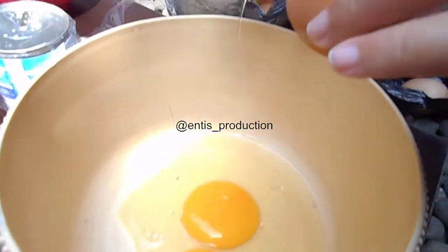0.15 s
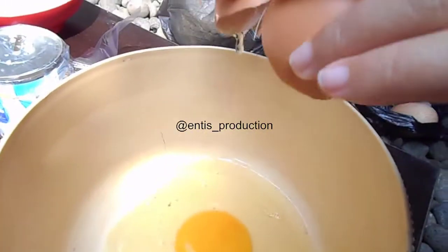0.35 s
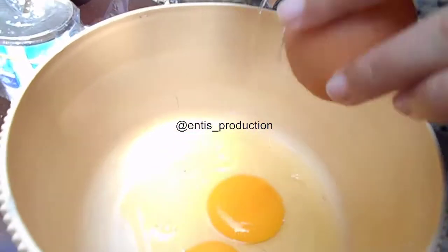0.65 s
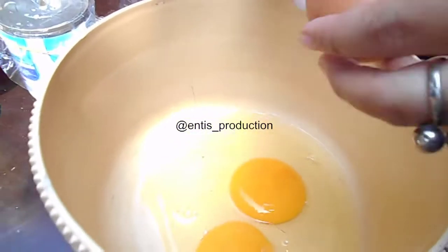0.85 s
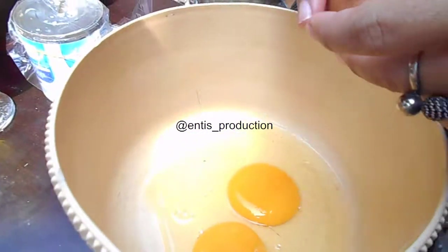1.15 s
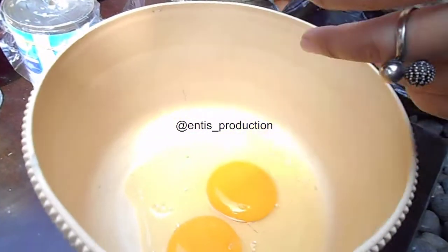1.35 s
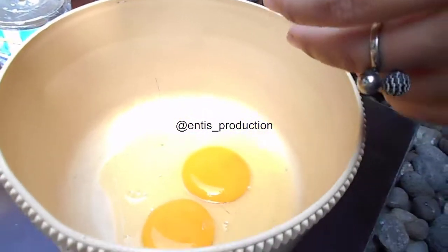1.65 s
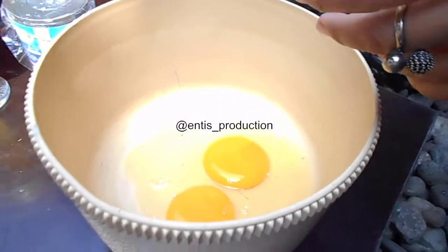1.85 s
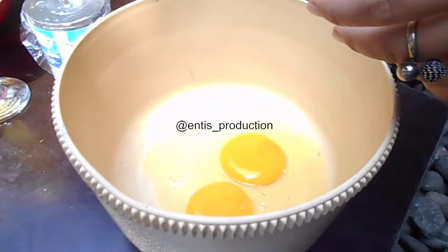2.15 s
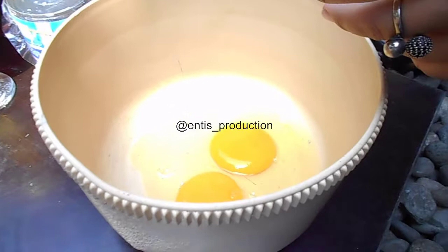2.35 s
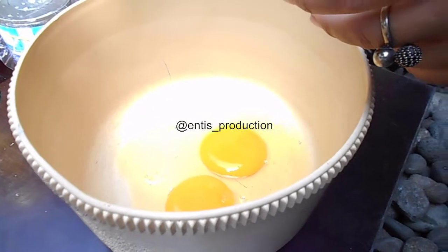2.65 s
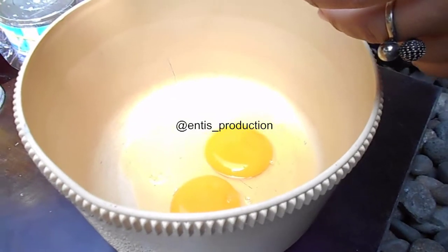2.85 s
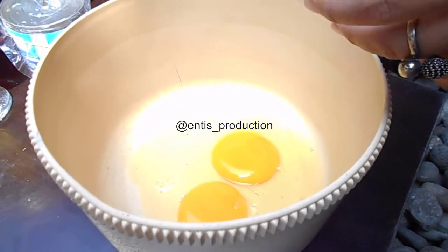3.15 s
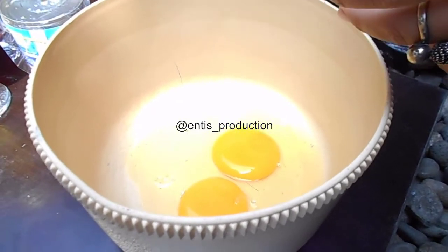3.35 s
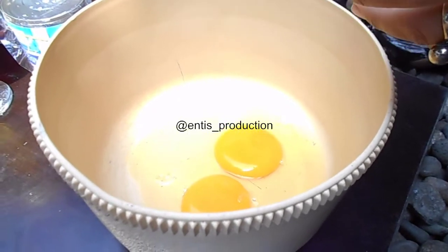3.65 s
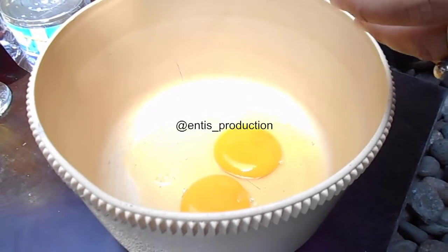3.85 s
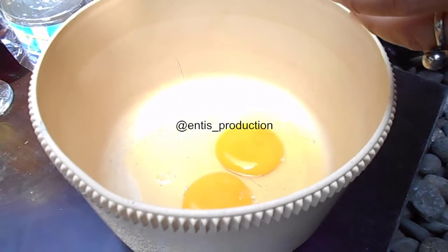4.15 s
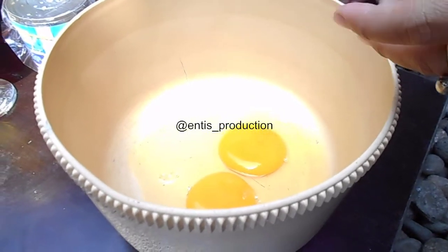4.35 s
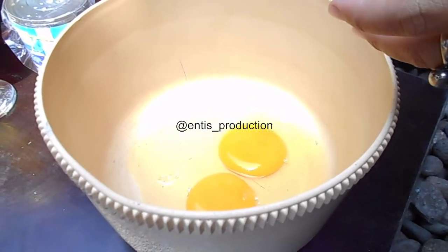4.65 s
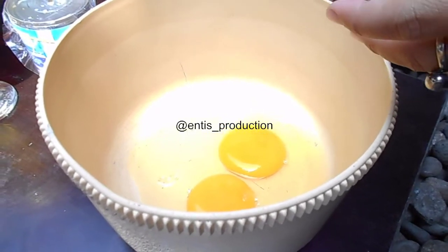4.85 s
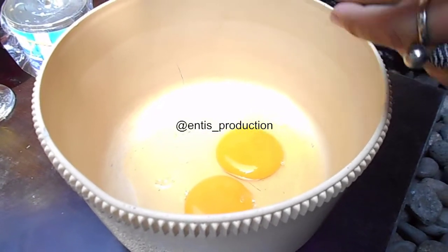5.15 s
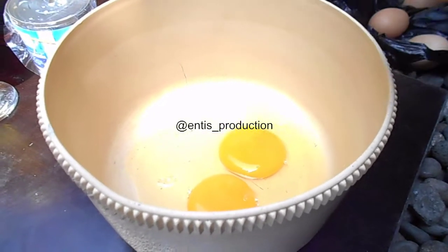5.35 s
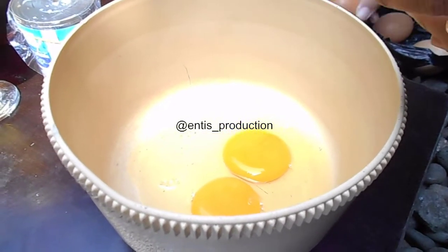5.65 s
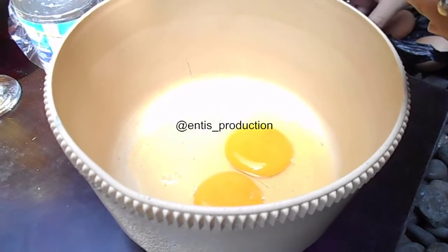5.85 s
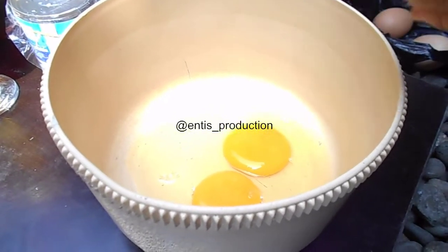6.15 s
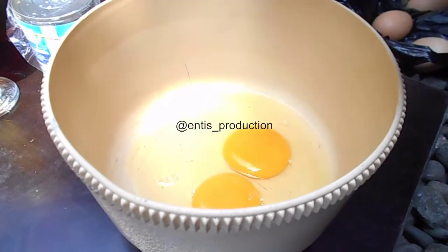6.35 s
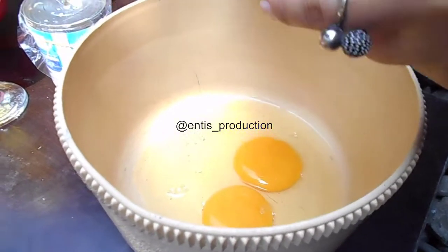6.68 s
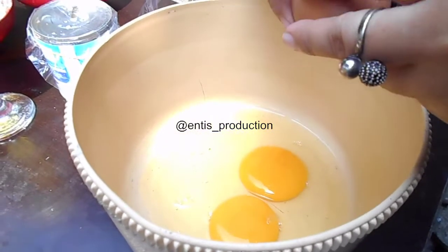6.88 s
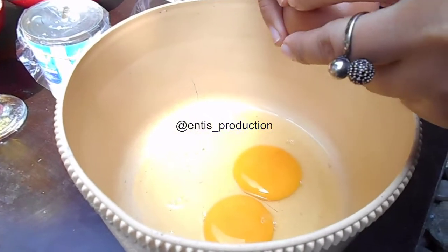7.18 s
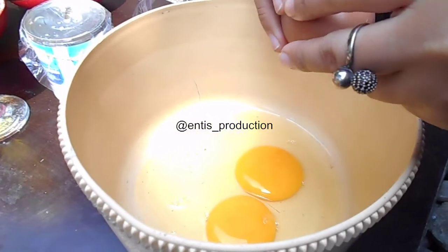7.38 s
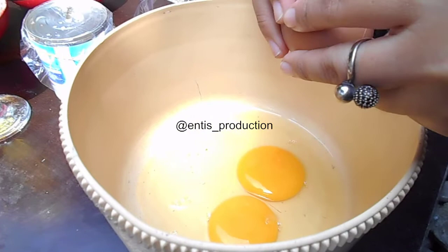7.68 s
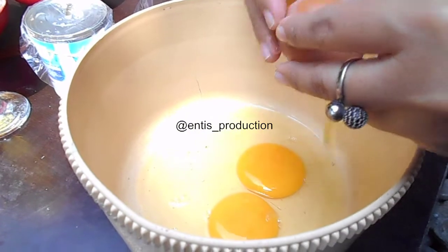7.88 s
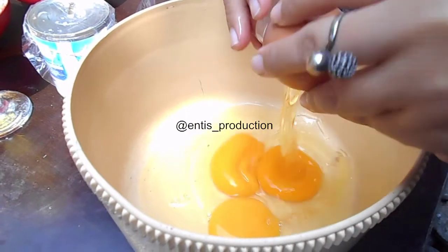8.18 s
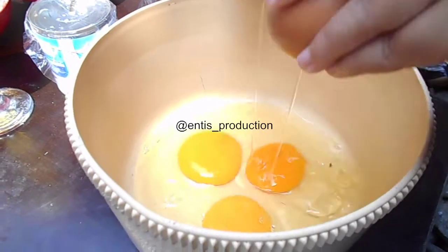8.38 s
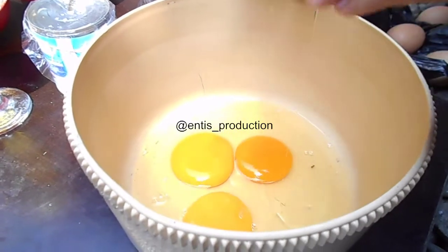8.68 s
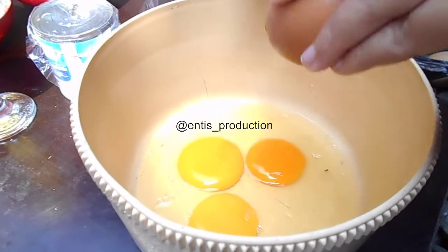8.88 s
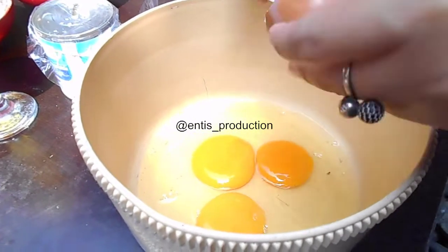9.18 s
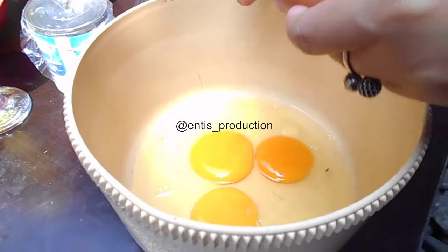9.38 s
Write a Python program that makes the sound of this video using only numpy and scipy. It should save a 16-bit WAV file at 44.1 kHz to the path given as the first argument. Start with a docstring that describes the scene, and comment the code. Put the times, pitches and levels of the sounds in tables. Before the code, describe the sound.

Eggshell crackles and something rustles, then an egg is knocked on a plastic bowl and snapped open, close up.

```python
"""Empty eggshell crackles in the hand, close to a small microphone, over steady air and a far hum.
Faint chirps carry in from a long way off, and something rustles with a soft hiss. The next egg is knocked
four times on the rim of a plastic mixing bowl, which rings and clatters on the table; then thumbs snap
it open. Each crack is a run of tiny breaks that sounds the shell's hollow and has a thin, bright ring.
The microphone overloads on the loud hits."""
import sys
import numpy as np
from scipy import signal
from scipy.fft import rfft, irfft, next_fast_len
from scipy.io import wavfile
from scipy.ndimage import uniform_filter1d

SR = 44100
rng = np.random.default_rng(int(sys.argv[2]) if len(sys.argv) > 2 else 0)


def wav_out(sig):
    """Save sig, one row per channel (or a flat mono array), as 16-bit PCM at SR to the path in sys.argv[1]."""
    wavfile.write(sys.argv[1], SR, np.round(np.clip(np.atleast_2d(sig).T, -1, 1) * 32767).astype(np.int16))


N = 419743
TIME = np.arange(N) / SR
HIT = np.arange(SR // 3) / SR   # seconds since a hit

# Spectrum of a tick or a crinkle. Each row: frequency in Hz, relative level in dB.
TICK_SPECTRUM = [(300, -25), (2000, -18), (5000, -11), (8500, 19), (13000, 6), (16000, -23.5)]


def from_db(db):
    """Decibels to gain."""
    return 10 ** (np.asarray(db) / 20)


def rms_one(x):
    """Scale to rms 1."""
    return x / np.sqrt(np.mean(x ** 2) + 1e-20)


def in_time(rows):
    """The columns of a curve at every sample."""
    s, *columns = np.transpose(rows)
    return [np.interp(TIME, s, c) for c in columns]


def add(track, s, sound):
    """Mix a sound in at s seconds."""
    at = max(0, round(s * SR))
    track[at:at + len(sound)] += sound[:max(0, N - at)]


def noise(spectrum, size):
    """Noise of rms 1, coloured by rows of frequency in Hz and spectral density in dB."""
    hz, db = np.transpose(spectrum)
    padded = next_fast_len(size)
    bins = np.maximum(np.fft.rfftfreq(padded, 1 / SR), 1)
    gain = from_db(np.interp(np.log(bins), np.log(hz), db))
    return rms_one(irfft(rfft(rng.standard_normal(padded)) * gain, padded)[:size])


def drift(per_s, size):
    """Random wander with a spread near 1."""
    steps = np.arange(size) * per_s / SR
    return np.interp(steps, np.arange(size), rng.standard_normal(size))


def resonate(x, hz, width_hz):
    """A resonance that keeps the power of white noise."""
    r = np.exp(-np.pi * width_hz / SR)
    feed = np.sqrt((1 - r * r) / 2) * np.array([1, 0, -1])
    return signal.lfilter(feed, [1, -2 * r * np.cos(2 * np.pi * hz / SR), r * r], x + 1e-18)


def burst(length, t60):
    """Envelope that holds for length seconds, then falls 60 dB every t60 seconds."""
    return from_db(-60 * np.maximum(HIT - length, 0) / t60)


def shaped(x, envelope):
    """Put an envelope on a sound, with the energy that the envelope itself has."""
    return rms_one(x * envelope) * np.sqrt(np.mean(envelope ** 2))


def sizzle(peak_db=-44.5, rest_db=-58, swell_db=10.5, fade_s=0.068):
    """A thin high sizzle in the background: each spell swells to its end, then sinks back."""
    # Each row: start and end of a spell in seconds.
    spells = [(0, 1.2), (4.65, 5.2), (5.5, 6.5), (7.25, 7.8), (8.5, 9)]
    # Each row: centre of a band in Hz, width in Hz, relative level in dB.
    peaks = [(9100, 420, 0), (13000, 480, -1.5)]
    level_db = np.full(N, float(rest_db))
    for start, end in spells:
        during = (TIME >= start) & (TIME < end)
        level_db[during] = peak_db - swell_db * (end - TIME[during]) / (end - start)
    level_db = uniform_filter1d(level_db, size=int(fade_s * SR))
    bands = sum(from_db(db) * resonate(resonate(rng.standard_normal(N), hz, width), hz, width)
                for hz, width, db in peaks)
    return from_db(level_db) * rms_one(bands)


def air():
    """Room tone: steady air with a low rumble under it and the sizzle on top."""
    # Colour of the air. Each row: frequency in Hz, relative level in dB.
    spectrum = [(25, -5.5), (80, -0.5), (140, -2), (250, -7), (500, -7), (1000, -9), (2000, -11.5),
                (4000, -14.5), (7000, -16.5), (9800, -16), (12500, -18.5), (16000, -20.5)]
    # Each row: time in seconds, air level in dB, rumble level in dB.
    levels = [(0, -39, -71), (1.5, -39, -54), (4.3, -39, -62), (5.1, -41, -52), (6.2, -40.5, -49.5),
              (7.4, -39.5, -47.5), (7.95, -44, -44), (8.7, -41, -50), (9.5, -40, -44.5)]
    air_db, rumble_db = in_time(levels)
    rumble = noise([(25, -11.5), (80, -9.0), (160, 1.0), (280, -3), (600, -15), (3000, -47)], N)
    return from_db(rumble_db) * rumble + sizzle() + from_db(air_db) * noise(spectrum, N)


def hum(waver_hz=3.25, waver_db=4.5, trim_db=-6.5):
    """A far machine hums on two low tones that waver in pitch and level."""
    # Each row: pitch in Hz, relative level in dB.
    tones = [(86.1, -55), (150.7, -51)]
    # Swell of the hum. Each row: time in seconds, gain in dB.
    swell = [(0, 2), (.7, 9), (1.6, 7), (2.2, -12), (5.2, -18), (7.3, 9), (8.6, 8), (9.5, 1)]
    swell_db, = in_time(swell)
    out = np.zeros(N)
    for hz, db in tones:
        level = from_db(db + waver_db * drift(1.98, N))
        pitch = hz + waver_hz * drift(5.2, N)
        out += level * np.sin(2 * np.pi * np.cumsum(pitch) / SR)
    return from_db(swell_db + trim_db) * out


def breaks(per_s, size, spread_db=1.0, t60=0.0079):
    """Loudness of a run of tiny breaks, the first at once, each dying fast."""
    gaps = rng.gamma(3, 1 / 3, size // 8)
    at = (np.cumsum(gaps) * SR / per_s).astype(int)
    clicks = np.zeros(size)
    clicks[at[at < size]] = 1
    clicks *= from_db(spread_db * rng.standard_normal(size))
    clicks[0] = 1
    return signal.lfilter([1], [1, -from_db(-60 / (t60 * SR))], clicks)


def fracture(length, hollow_hz, tilt_db, crack_db, hollow_db, ring_db, piece_spread_db=4.5, hollow_q=8):
    """A run of tiny breaks sounds the hollow of the shell, with a thin, bright ring on top."""
    # Modes of the hollow. Each row: multiple of its pitch, relative level in dB.
    hollow_modes = [(1, 7), (1.27, -4)]
    # A thin, bright ring on each crack. Each row: frequency in Hz, width in Hz, relative level in dB.
    treble_ring = [(9040, 2000, -7.5), (9760, 2100, -15), (11550, 2400, -5.5)]
    size = len(HIT)
    run = breaks(per_s=800, size=size)
    # every piece of shell has a colour of its own, and is too small to radiate bass
    bands = np.geomspace(1500, 15000, num=24)
    colour = tilt_db * np.log2(np.minimum(bands, 9000) / 8000)
    colour += piece_spread_db * rng.standard_normal(len(bands))
    bass = [(100, colour[0] - 22), (900, colour[0] - 16)]
    crack = noise([*bass, *zip(bands, colour), (17000, colour[-1] - 22)], size)
    hollow_drive, ring_drive = rng.standard_normal((2, size)) * run
    hollow = sum(from_db(db) * resonate(hollow_drive, hollow_hz * k, hollow_hz / hollow_q)
                 for k, db in hollow_modes)
    hollow = resonate(hollow, hollow_hz * 1.13, hollow_hz * .33)
    ring = sum(from_db(db) * resonate(resonate(ring_drive, hz, width), hz, 2 * width)
               for hz, width, db in treble_ring)
    return (from_db(crack_db) * shaped(crack * run, burst(length * 0.98, t60=0.011))
            + from_db(hollow_db) * shaped(hollow, burst(length * 0.92, t60=0.021))
            + from_db(ring_db) * shaped(ring, burst(length, t60=0.018)))


def dry_cracks():
    """Dry shell cracks by the microphone; a brighter crack has more treble ring and less hollow."""
    # Each row: start and length in seconds, level in dB, hollow's pitch in Hz, tilt in dB per octave.
    cracks = [(0.055, 0.016, -19.5, 7140, 1), (0.187, .007, -24, 4720, 4), (0.3178, .004, -9.5, 5030, 7),
              (0.328, 0.004, -15.5, 5040, 3), (0.336, 0.013, -15.5, 4870, 7.5),
              (0.348, 0.025, -24.5, 5440, 4), (0.8898, .0024, -13, 7400, 11), (0.999, 0.0081, -17, 1560, 6),
              (2.384, 0.0054, -11.5, 6240, 4), (2.446, 0.0066, -20, 5640, 4),
              (2.475, 0.0033, -15.5, 5670, 2.5), (2.5264, .002, -4.5, 5570, 0.5),
              (2.918, .007, -16, 1840, 8), (3.02, 0.0026, -23, 7160, -2), (3.125, .004, -20, 4970, 5),
              (4.467, 0.011, -36, 7040, 3), (4.754, .0023, -30, 5480, 6), (5.398, .0011, -27.5, 7000, 2),
              (5.818, 0.00087, -7.5, 1330, 2), (5.8654, .0018, -19, 4400, -3),
              (7.7097, 0.00088, -4.5, 3700, -0.5), (7.7218, 0.0038, 0.5, 3530, 2),
              (7.7443, .0027, 2.5, 3460, 2), (7.76, 0.0037, -0.5, 2890, 1.5), (7.7647, .01, -1, 2890, 0.5),
              (8.144, 0.0015, -7, 4200, -2), (8.2135, 0.002, -15.5, 6700, -0.5),
              (8.382, 0.0015, -22, 2410, 1), (9.039, 0.00044, -16, 7350, 13), (9.436, 0.0016, -20, 1580, 1),
              (9.453, 0.0049, -8, 1820, 8), (9.459, 0.0098, -9.5, 1640, 1)]
    out = np.zeros(N)
    for s, length, db, hz, tilt in cracks:
        hollow_db, ring_db = db - 5 - 0.46 * tilt, db - 5 + 0.87 * tilt
        add(out, s, fracture(length, hz, tilt, db, hollow_db, ring_db))
    return out


def echoes(x, t60):
    """Diffuse reflections of unit energy, reaching the microphone from 3 ms on."""
    # Colour of the reflections. Each row: frequency in Hz, relative level in dB.
    spectrum = [(100, 14.5), (1000, 3), (3000, 5.5), (6000, 3.5), (16000, -2)]
    tail = noise(spectrum, len(HIT)) * burst(0, t60) * (HIT > .003)
    return signal.fftconvolve(x, tail / np.linalg.norm(tail))[:N]


def ticks(per_s=9.9, tick_db=-40, spread_db=6):
    """Faint random ticks of wet fingertips and shell crumbs, close up."""
    out = np.zeros(N)
    for s in TIME[rng.random(N) < per_s / SR]:
        tick = noise(TICK_SPECTRUM, size=1024) * burst(0, t60=.022)[:1024]
        add(out, s, from_db(tick_db + spread_db * rng.uniform(-0.59, 1)) * tick)
    return out


def chirps(length_s=0.0683, glide=0.0534, waver=.02, hoarse=.6, far_t60=0.6, echo_db=5):
    """Short wavering whistles with a hoarse edge, smeared by the echoes of a long way."""
    # Each row: start in seconds, pitch in Hz, level in dB ahead of the echoes.
    calls = [(0.14, 6900, -41.5), (0.18, 3900, -41.5), (0.301, 4200, -45), (0.865, 4460, -36),
             (0.945, 3740, -40), (1.0, 5300, -40.5), (1.02, 4340, -38.5), (1.11, 3670, -43),
             (1.398, 4330, -43), (3.186, 4350, -41), (4.03, 4430, -36), (4.19, 3880, -39),
             (6.70, 4800, -43), (6.79, 3800, -43.5), (7.05, 4280, -46), (7.12, 4260, -41),
             (7.22, 4560, -46), (7.21, 6630, -44), (7.39, 6050, -46), (8.46, 5520, -49)]
    out = np.zeros(N)
    along = np.minimum(HIT / length_s, 1)
    arch = np.sqrt(abs(np.sin(np.pi * along)))
    for s, hz, db in calls:
        slide = glide * rng.standard_normal() * (along - .5)
        pitch = hz * (1 + slide + waver * drift(500, len(HIT)))
        edge = noise([(hz / 2, -30), (hz * 0.74, -5), (hz, 0), (hz * 1.35, -6), (hz * 2, -30)], len(HIT))
        whistle = np.sin(2 * np.pi * np.cumsum(pitch) / SR) + hoarse * edge
        add(out, s, from_db(db) * arch * whistle)
    return from_db(echo_db) * echoes(out, far_t60)


def wet_pops():
    """Wet shell pops in the hand, mostly with the note of its hollow."""
    # Each row: start in seconds, length in seconds, level in dB, pitch in Hz.
    pops = [(0.961, 0.0019, -19, 1740), (0.992, 0.0038, -17, 1500), (1.074, 0.0034, -22, 1600),
            (1.125, 0.01, -22, 1640), (1.169, .0014, -22, 1420), (2.385, 0.0049, -24, 1830),
            (2.481, 0.0034, -27, 1890), (2.84, .005, -25.5, 1940), (2.953, 0.0046, -22.5, 1830),
            (7.713, 0.0088, -17.5, 3450), (7.85, 0.00091, -25.5, 2050), (7.868, 0.0008, -25, 2150),
            (7.981, 0.0015, -34, 1950), (8.2252, 0.0075, -3, 1920), (9.323, 0.001, -15.5, 1910),
            (9.353, 0.0019, -23, 2060), (9.477, 0.0021, -16, 1660)]
    out = np.zeros(N)
    for s, length, db, hz in pops:
        add(out, s, fracture(length, hz, tilt_db=-1.5, crack_db=db - 4.5, hollow_db=db, ring_db=db - 26))
    return out


def rustle(grain_db=1.5, flutter_db=2.0, hiss_db=0.62, crinkle_db=-7, fold_db=-14):
    """Thin surfaces slide over each other: uneven hiss, a duller body, crinkles and pitched creases."""
    # Three rubs, then a brush of the hand bringing the egg. Each row: time in seconds, level in dB.
    first_rub = [(1.2, -44), (1.36, -34.5), (1.612, -48.5), (1.622, -36), (1.652, -24), (1.752, -22.5),
                 (1.802, -25.5), (1.826, -23), (1.96, -34)]
    second_rub = [(1.96, -31.5), (2.05, -26.5), (2.17, -27), (2.2, -23), (2.32, -25.5), (2.38, -24),
                  (2.53, -19.5), (2.57, -22.5), (2.77, -23.5), (2.79, -26.5), (2.88, -28.5), (2.93, -20.5),
                  (2.98, -29.5), (3.1, -31)]
    third_rub = [(3.1, -36), (3.126, -15.5), (3.148, -12.5), (3.19, -24), (3.364, -20), (3.392, -27.5),
                 (3.424, -20.5), (3.714, -23), (3.77, -15), (3.87, -27), (3.972, -17), (4.074, -29.5),
                 (4.116, -23.5), (4.318, -37), (4.326, -25), (4.355, -27)]
    brush = [(6.62, -57), (6.758, -37.5), (7.042, -54), (7.05, -58)]
    # For each of the four: the body in dB relative to the rub, when the rub is at -25 dB.
    body_levels = [-12, -14, -11, -2.5]
    # Colours of hiss and body. Each row: frequency in Hz, relative level in dB.
    hiss_spectrum = [(400, -30), (2000, -12), (3500, -6), (5000, -2.5), (6200, -3), (8000, 0), (10000, .5),
                     (13000, -.5), (15500, -4.5)]
    body_spectrum = [(150, -34), (400, -7), (560, 3.5), (750, -3.5), (1050, 5), (1450, -5.5), (2300, 4),
                     (2650, 4), (3100, -8), (3700, -5.5), (6000, -6.5), (12000, -2.5)]
    # Each row: pitch of a crease in Hz, width in Hz, relative level in dB.
    creases = [(1930, 280, -2.5), (2830, 150, -3.5), (4660, 120, 0.5), (6440, 800, 1)]
    rubbing, body = np.zeros(N), np.zeros(N)
    for rub, body_db in zip([first_rub, second_rub, third_rub, brush], body_levels):
        db, = in_time(rub)
        touching = (TIME >= rub[0][0]) & (TIME < rub[-1][0])
        level = from_db(db) * uniform_filter1d(1. * touching, size=400)
        rubbing += level
        body += level * from_db(np.minimum(body_db - 0.1 * (db + 25), 1))   # harder rubbing is brighter
    grain = rms_one(from_db(grain_db * drift(1200, N) + flutter_db * drift(90, N)))
    hiss = rubbing * from_db(hiss_db) * noise(hiss_spectrum, N)
    sliding = grain * (hiss + body * noise(body_spectrum, N))
    crinkles = rms_one(breaks(per_s=90, size=N, spread_db=3.0, t60=0.011)) * noise(TICK_SPECTRUM, N)
    folds = np.zeros(N)
    for hz, width, db in creases:
        snaps = breaks(per_s=45, size=N, spread_db=3.5, t60=0.02) * rng.standard_normal(N)
        folds += from_db(db) * resonate(snaps, hz, width)
    return sliding + rubbing * (from_db(crinkle_db) * crinkles + from_db(fold_db) * rms_one(folds))


def bumps():
    """Light bumps as the hand reaches for the egg, each one short resonance."""
    # Each row: start in seconds, pitch in Hz, level in dB.
    touches = [(3.7064, 870, -21), (3.7298, 910, -19), (3.806, 1200, -27.5)]
    out = np.zeros(N)
    for s, hz, db in touches:
        ring = resonate(rng.standard_normal(len(HIT)), hz, width_hz=300)
        add(out, s, from_db(db) * shaped(ring, burst(0.0012, t60=0.055)))
    return out


def bowl_knocks(clatter_db=-7, flex_s=0.00088):
    """The egg crushes on the rim; the bowl rings, clatters on the table and booms on."""
    # Each row: start in seconds, bowl gain in dB, contact cut-off in Hz, crunch level in dB,
    # crunch length in seconds, boom pitch in Hz, boom level in dB, boom t60 in seconds.
    knocks = [(4.3616, 11, 1710, -7, 0.0033, 595, -9.5, 0.33),
              (4.5871, 4, 3000, 0.5, 0.0016, 943, -6, 0.24),
              (4.8191, -5.5, 4000, -7.5, 0.0017, 980, -19.5, 0.25),
              (5.8051, -5, 1010, -8, 0.0042, 563, -25, 0.25)]
    # Modes of the plastic bowl. Each row: frequency in Hz, relative level in dB, t60 in seconds.
    modes = [(143, -23, 0.2), (268, -10, 0.087), (390, -17.5, 0.17), (464, -18, 0.19), (513, -7, 0.07),
             (580, 0.5, 0.086), (688, -15, 0.12), (710, -27.5, 0.44), (811, -3, 0.059), (880, -8.5, 0.092),
             (1011, -5, 0.059), (1292, -13.5, 0.09), (1388, -5, 0.031), (1665, 3, 0.027),
             (1852, -0.5, 0.026), (2050, -27, 0.027), (2980, -6.5, 0.051)]
    # Dull clatter on the table, crunch on the rim. Each row: frequency in Hz, relative level in dB.
    clatter_spectrum = [(30, -14), (200, -14), (350, -2), (500, 25), (800, -12), (1600, 12), (2500, 4),
                        (4000, -28), (8000, -19), (16000, -36)]
    crunch_spectrum = [(100, -15), (700, -3), (1800, -2), (4000, -3.5), (8000, -2), (13000, -6),
                       (16000, -21)]
    out, size = np.zeros(N), len(HIT)
    flex = 1 - np.exp(-HIT / flex_s)   # the bowl takes a moment to give
    for s, bowl_db, contact_hz, crunch_db, length, boom_hz, boom_db, boom_t60 in knocks:
        ring = np.zeros(size)
        for k, (hz, db, t60) in enumerate(modes):
            strength = (-1) ** k * from_db(db + rng.standard_normal())
            ring += strength * np.sin(2 * np.pi * hz * HIT) * burst(0, t60)
        clatter = from_db(clatter_db) * shaped(noise(clatter_spectrum, size), burst(0, t60=.075))
        # a soft contact is dull, and the bowl's ring carries little bass
        body = signal.lfilter(*signal.butter(1, contact_hz, fs=SR), ring + clatter)
        body = from_db(bowl_db) * signal.lfilter(*signal.butter(2, 150, "high", fs=SR), body)
        crunch = noise(crunch_spectrum, size) * breaks(per_s=500, size=size, t60=0.003)
        crunch = from_db(crunch_db) * shaped(crunch, burst(length, t60=0.057))
        boom = noise([(boom_hz / 4, -26), (boom_hz * .7, -7), (boom_hz, 0),
                      (boom_hz * 1.5, -9), (boom_hz * 3, -24), (boom_hz * 14, -38)], size)
        boom = from_db(boom_db) * shaped(boom, burst(0, boom_t60))
        add(out, s, flex * (body + boom) + crunch)
    return out


def scene(room_db=-23, room_t60=0.19):
    """Egg and bowl close to one microphone, with a little room; everything else behind."""
    close = dry_cracks() + wet_pops() + bowl_knocks() + bumps() + ticks()
    room = from_db(room_db) * echoes(close, room_t60)
    return (close + room + rustle() + chirps() + air() + hum())[None]


def record(dry, notch_hz=11050, notch_share=.81, ceiling=0.93, cutoff_hz=15700):
    """The microphone port cuts a notch in the treble, loud peaks clip, the top is cut."""
    notched = signal.lfilter(*signal.iirnotch(notch_hz, Q=7.0, fs=SR), dry)
    clipped = np.clip(dry + notch_share * (notched - dry), -ceiling, ceiling)
    return signal.sosfilt(signal.ellip(10, .1, 70, cutoff_hz, fs=SR, output="sos"), clipped)


dry = scene()
out = record(dry)
wav_out(out)
```